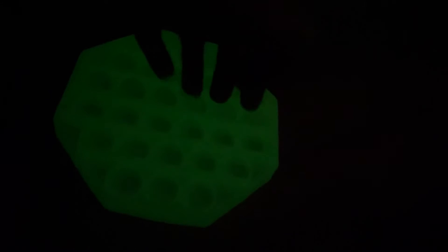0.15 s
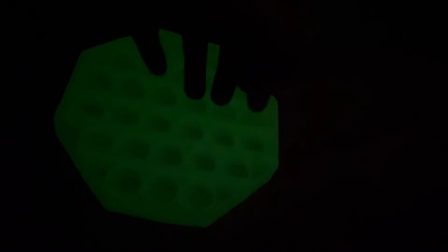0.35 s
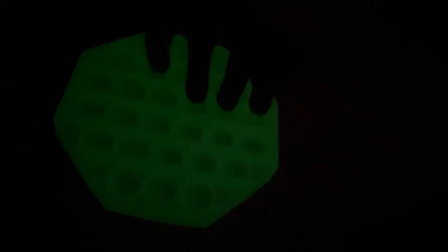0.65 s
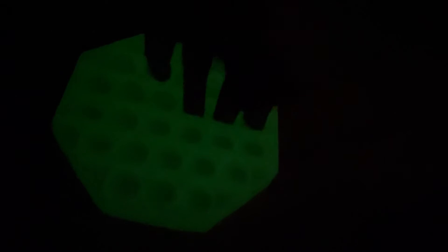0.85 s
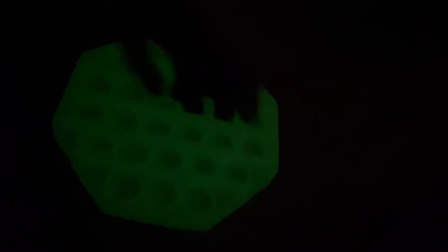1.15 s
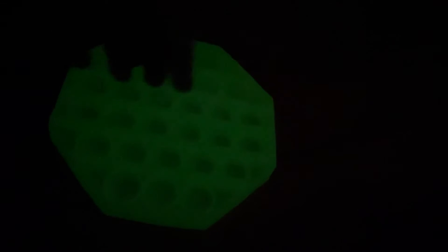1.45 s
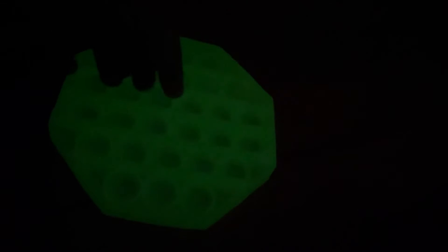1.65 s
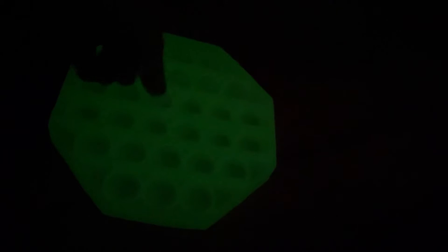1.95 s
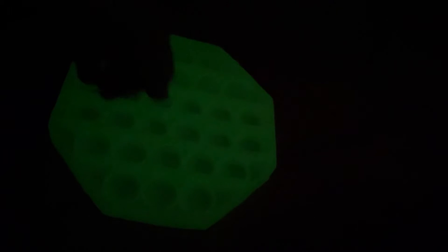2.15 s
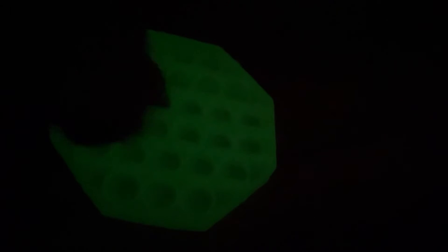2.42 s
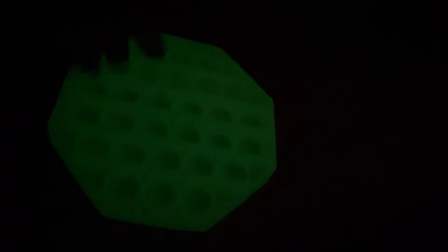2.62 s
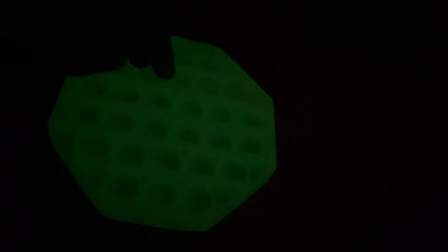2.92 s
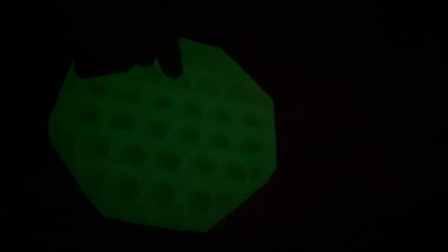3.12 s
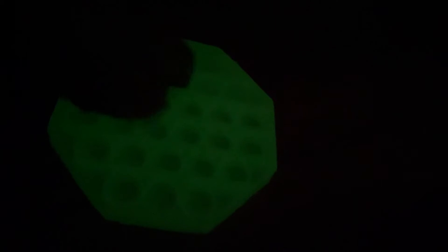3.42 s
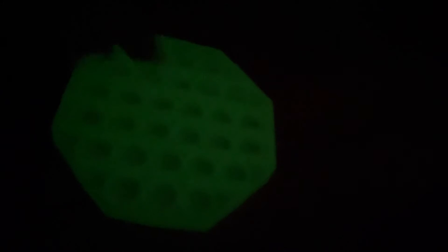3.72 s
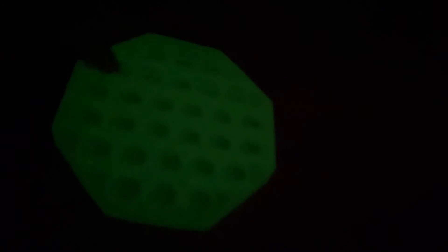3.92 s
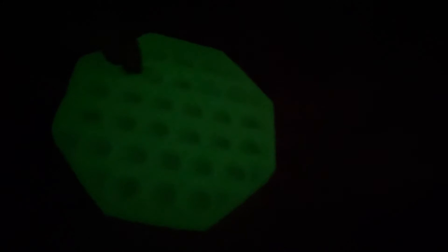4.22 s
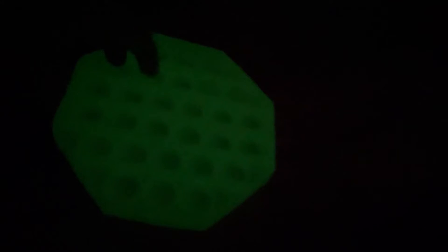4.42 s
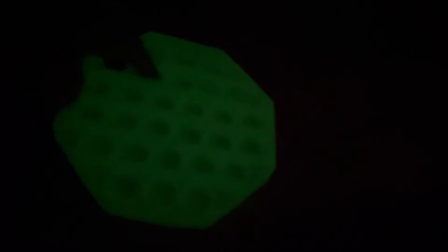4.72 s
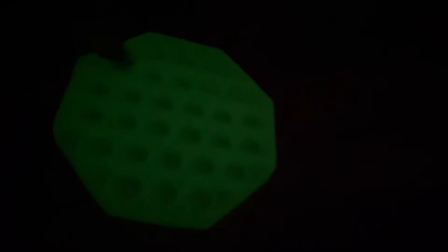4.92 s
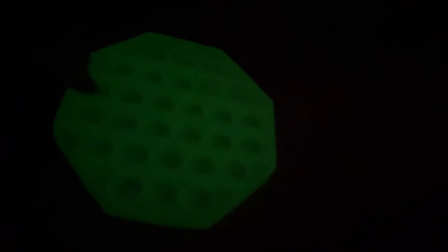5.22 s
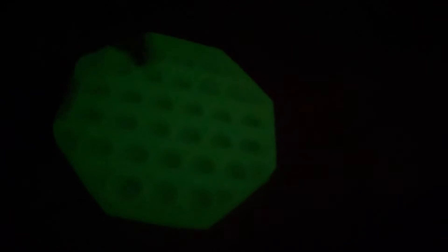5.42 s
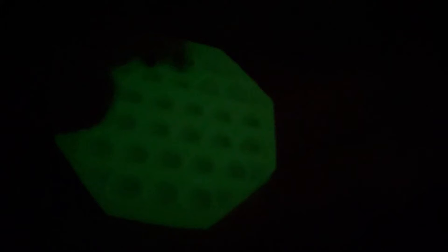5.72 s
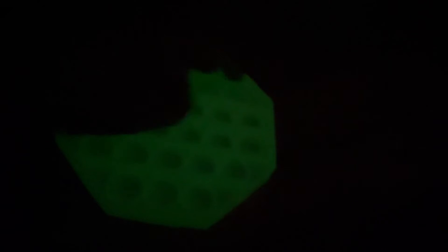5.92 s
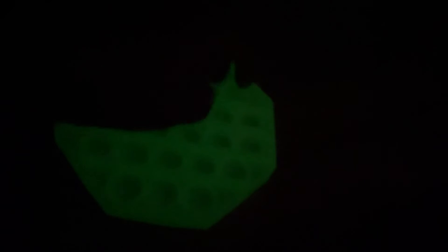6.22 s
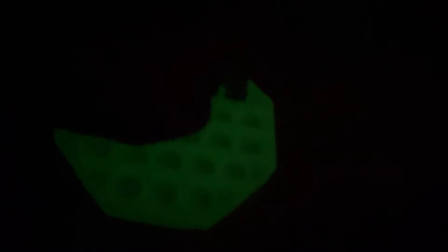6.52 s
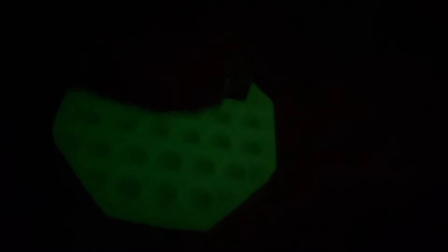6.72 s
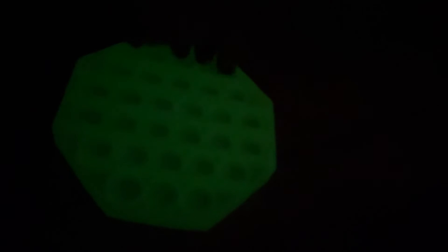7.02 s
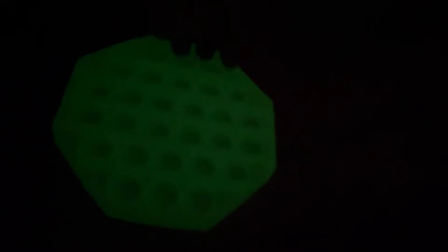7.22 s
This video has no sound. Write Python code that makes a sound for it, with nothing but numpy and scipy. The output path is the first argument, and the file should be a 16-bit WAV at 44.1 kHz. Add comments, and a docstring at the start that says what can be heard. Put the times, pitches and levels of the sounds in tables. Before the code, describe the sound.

Silicone fidget-toy domes pop hollowly under fingertips, with soft table thuds, skin scuffs and sticky crackles over a wavering low hum in a quiet room.

```python
"""The bubbles of a silicone fidget toy are pressed on a table, close by in a quiet room.
Each dome snaps through with a hollow pop, made of a short swing, ringing rim modes and quick echoes.
Fingertips thud on the table as ringing modes; tacky rubber crackles and scuffs as snaps in resonators.
Skin brushes over the toy as flickering noise with gritty squeaks.
Farther back lie a low hum that wavers and the noise of the room air; diffuse reverberation follows."""
import sys
import numpy as np
from scipy import signal
from scipy.io import wavfile

SR = 44100
rng = np.random.default_rng(int(sys.argv[2]) if len(sys.argv) > 2 else 0)


def to_wav(s):
    """Save 16-bit WAV."""
    ch = np.atleast_2d(s).T  # columns
    pcm = np.round(np.clip(ch, -1, 1) * 32767)  # PCM
    wavfile.write(sys.argv[1], SR, pcm.astype(np.int16))


N = 324576
TIME = np.arange(N) / SR  # s

# low hum before placement: (t/s, level/dB)
HUM_LEVEL = [(0.0, -46.5), (0.53, -40), (0.65, -55), (0.84, -42.5), (1.82, -41), (1.97, -48), (2.33, -38),
             (2.48, -47), (2.64, -34), (3.05, -45), (3.32, -39), (3.63, -57), (3.94, -48.5), (5.49, -57),
             (5.7, -43.5), (6.17, -59), (6.44, -54.5), (6.6, -44), (6.93, -40.5), (7.36, -46.5)]
HUM_HZ = 50.36
# colour of the room air: (f/Hz, relative level per Hz/dB)
AIR_COLOUR = [(65, 5.5), (82, -2.5), (165, -12), (245, -17), (320, -25), (700, -36), (1500, -48),
              (7000, -50.5), (9000, -52.5), (12000, -46.5), (16000, -81)]
AIR_DB = -60.5
# correlation of left and right in diffuse noise: (f/Hz, likeness)
STEREO_LIKENESS = [(100, 0.9), (400, 0.57), (1500, 0.062), (12000, 1)]
# decay of the room by 60 dB: (f/Hz, t60/s)
ROOM_DECAY = [(1000, 0.31), (12000, 0.22)]
# skin brushing the toy, before the gains in brushing():
# (start of full strength t/s, time held/s, rub level/dB, fine hiss level/dB)
BRUSH_STROKES = [(0.658, 0.071, -67.5, -81), (0.888, 0.063, -77.5, -79), (1.132, 0.0081, -62, -64.5),
                 (1.158, 0.031, -63.5, -74), (1.223, 0.021, -59.5, -73.5), (1.299, 0.026, -66.5, -73),
                 (1.392, 0.087, -81, -90), (1.751, 0.028, -73, -86), (2.251, 0.037, -59.5, -74),
                 (2.465, 0.0093, -67.5, -83), (2.506, 0.032, -60, -68), (3.391, 0.077, -72, -69.5),
                 (3.609, 0.048, -63.5, -68), (4.146, 0.045, -77, -88), (4.459, 0.092, -77.5, -74.5),
                 (4.606, 0.11, -61.5, -70.5), (5.543, 0.096, -100, -83), (5.918, 0.059, -79, -78.5),
                 (6.808, 0.034, -64, -71)]
STROKE_ATTACK_S, STROKE_RELEASE_SHARE = 0.022, 0.87  # the fade is a share of the time held
# colour of the rub: (f/Hz, relative level per Hz/dB)
RUB_COLOUR = [(400, -19.5), (750, 7), (1200, -1.5), (1600, -2.5), (2300, -6), (3600, -19.5), (7000, -30),
              (12000, -51)]
# colour of the fine hiss: (f/Hz, relative level per Hz/dB)
HISS_COLOUR = [(1500, 6.5), (6000, 1), (8500, -1), (10500, 17), (12200, 7), (14000, -14.5)]
RUB_LEFT_DB = 6  # the rub is louder on the left
# fingertips sticking and slipping, before placement:
# (t/s, peak level/dB, length/s, starting pitch f/Hz)
STICK_SLIPS = [(0.684, -52.5, 0.013, 1055), (1.133, -52, 0.0094, 900), (1.281, -57.5, 0.062, 770),
               (1.483, -64, 0.035, 780), (1.513, -67, 0.015, 2030), (1.73, -82, 0.039, 780),
               (1.949, -64, 0.034, 670), (2.246, -34, 0.019, 730), (2.638, -55, 0.019, 990),
               (3.396, -42.5, 0.03, 1900), (3.71, -28, 0.0053, 1835), (4.609, -55, 0.1, 760),
               (4.659, -47, 0.018, 2160), (4.684, -45, 0.03, 2130), (4.763, -57, 0.045, 1140),
               (4.852, -68.5, 0.026, 1120), (4.9186, -56, 0.017, 1300), (4.997, -62, 0.046, 815),
               (5.917, -65, 0.085, 1830), (6.148, -67, 0.042, 710), (6.796, -52.5, 0.013, 1200),
               (7.031, -39.5, 0.018, 898), (7.035, -52, 0.014, 1780), (7.1225, -59, 0.01, 1450),
               (7.214, -64.5, 0.039, 850)]
# tacky rubber letting go of the skin, before placement:
# (t/s, peak level/dB, decay time/s, ring f/Hz)
RUBBER_RELEASES = [(0.746, -41.5, 0.0019, 1900), (0.7626, -42.5, 0.0025, 3950), (0.77, -41, 0.01, 2440),
                   (0.787, -40, 0.0039, 9200), (2.2168, -49.5, 0.0017, 2400), (2.2555, -25, 0.0035, 3970),
                   (2.2807, -34, 0.0033, 5460), (3.4183, -32.5, 0.004, 2300), (3.7064, -31, 0.0015, 4930),
                   (4.27, -62.5, 0.013, 6430), (4.607, -25, 0.0063, 11400), (4.6073, -40, 0.016, 2770),
                   (6.506, -44, 0.0014, 2007), (6.528, -38, 0.0016, 2550), (6.5365, -45.5, 0.007, 9800)]
# resonances that colour a crackle: (f/Hz, width/Hz, level/dB)
RUBBER_RESONANCES = [(1931, 180, 2.5), (3000, 530, -15.5), (4993, 240, -11), (7220, 280, -7),
                     (11100, 5200, 3)]
RING_Q = 3.5
# louder crackles are sharper: brightness grows as a power of their strength
SHARP_ABOVE_DB, SHARP_POWER = -35, 0.65
# fingertips landing on the table, before placement:
# (t/s, tip peak level/dB, tip contact f/Hz, pad peak level/dB)
TABLE_BLOWS = [(0.755, -33, 235, -47), (0.929, -45, 119, -72), (2.249, -30.5, 108, -28),
               (3.397, -37, 154, -34.5), (3.458, -41.5, 216, -41.5), (3.715, -34.5, 117.8, -53),
               (4.093, -45.5, 327, -41.5), (4.53, -31, 189, -35.5), (4.589, -37, 174, -46.5),
               (6.513, -39, 222, -47.5), (6.545, -27.5, 200, -25), (6.607, -45, 110, -52.5),
               (7.0464, -28.5, 254, -41)]
# modes of the table top, before each blow shifts them: (f/Hz, level/dB, t60/s)
TABLE_MODES = [(86.5, -6.5, 0.3), (105, -8, 0.36), (145.3, -0.5, 0.14), (178, -4, 0.023),
               (266.2, -4, 0.068), (451.3, -11, 0.044)]
# the soft pad flattens a moment after the tip, always with the same low contact pitch
PAD_DELAY_S, PAD_HZ = 0.015, 129
# domes snapping through and smaller flicks of the rubber, before echoes and placement:
# (crest t/s, peak level/dB, pitch f/Hz)
DOME_POPS = [(0.7397, -36, 745), (0.7456, -27.5, 874), (0.7498, -23, 736), (0.7725, -37, 1150),
             (2.2172, -45, 1170), (2.2349, -35, 590), (2.2804, -23, 700), (2.524, -37, 910),
             (3.3912, -29, 684), (3.41, -37.5, 990), (3.453, -44, 870), (3.7074, -14.5, 1305),
             (4.0887, -51.5, 711), (4.368, -54, 1378), (4.5248, -29, 1053), (4.547, -40.5, 665),
             (4.588, -44, 902), (6.506, -27, 1038), (6.5292, -24, 1167), (6.5385, -19, 955),
             (6.833, -45, 1640), (7.0395, -37, 683)]
# modes of the rim of a dome: (f/Hz, level/dB, t60/s)
RIM_MODES = [(736, -5, 0.02), (1000, -7, 0.03), (1356, -4, 0.041), (1880, -1, .035), (2113, 3.5, 0.04)]
# nearby surfaces: (delay/ms, signed reflection strength)
NEAR_ECHOES = [(1.698, 0.22), (3.203, -.16), (5.5, 0.2)]
CUTOFF_HZ = 16000


def from_db(db):
    """Decibels to gain."""
    return 10 ** (np.asarray(db) / 20)


def rms_one(x):
    """Scale to unit power."""
    return x / np.sqrt(np.mean(x ** 2) + 1e-20)


def at_hz(points, hz):
    """Read a table on a log-frequency axis."""
    f, value = np.transpose(points)
    return np.interp(np.log(hz), np.log(f), value)


def cut(x, hz, kind, order=2):
    """Low- or high-pass."""
    sections = signal.butter(order, min(hz, .45 * SR), kind, fs=SR, output="sos")
    return signal.sosfilt(sections, x)


def resonate(x, hz, q):
    """One resonance, gain 1 on top."""
    return signal.lfilter(*signal.iirpeak(hz, q, fs=SR), x)


def struck(modes, t):
    """Modes ringing after a blow, each dying by 60 dB in its t60."""
    return sum(from_db(db - 60 * t / t60) * np.sin(2 * np.pi * hz * t) for hz, db, t60 in modes)


def delay(x, ms):
    """The same sound a little later."""
    return np.interp(TIME - ms / 1000, TIME, x, left=0)


def place(x, left_db, lag_ms):
    """A source off centre: louder on the left, a hair later on the right."""
    left = x * from_db(left_db / 2)
    right = delay(x, lag_ms) * from_db(-left_db / 2)
    return np.array([left, right])


def add(track, s, peak_db, sound):
    """Lay a sound into a track at a time and peak level."""
    at = round(s * SR)
    scaled = from_db(peak_db) * sound / np.abs(sound).max()
    track[at:at + len(sound)] += scaled[:N - at]


def drift(rate):
    """Chance values, `rate` a second and joined by straight lines, scaled to rms 1."""
    return rms_one(np.interp(TIME * rate, np.arange(4000), rng.standard_normal(4000)))


def noise_bands(size):
    """Third-octave bands of stereo noise, left and right as alike as the table says: (Hz, band)."""
    edges = np.geomspace(63, 16000, 25)
    white = rng.standard_normal((2, 2, size))
    for k, (low, high) in enumerate(zip(edges, edges[1:])):
        sections = signal.butter(2, [low, high], "band", fs=SR, output="sos")
        mid, side = signal.sosfilt(sections, white[k % 2])  # neighbouring bands stay independent
        hz = np.sqrt(low * high)
        alike = np.clip(at_hz(STEREO_LIKENESS, hz), -1, 1)
        yield hz, np.sqrt(1 + alike) * mid + np.sqrt(1 - alike) * side * [[1], [-1]]


def noise(spectrum, patchy_db=0):
    """Stereo noise with a given colour, each band flickering on its own by patchy_db; rms 1."""
    total = 0
    for hz, band in noise_bands(N):
        if hz >= spectrum[0][0]:
            total = total + from_db(at_hz(spectrum, hz) + patchy_db * drift(35)) * band
    return rms_one(total)


def room_air():
    """The quiet around the table: steady diffuse noise."""
    return from_db(AIR_DB) * noise(AIR_COLOUR)


def hum(octave_db, waver_hz, flutter_db):
    """A low tone that swells and wavers, with a weak, unsteady octave."""
    level_db = np.interp(TIME, *np.transpose(HUM_LEVEL)) + flutter_db * drift(14)
    phase = 2 * np.pi * np.cumsum(HUM_HZ + waver_hz * drift(8.7)) / SR
    octave = from_db(octave_db) * np.sin(2 * phase + drift(3.5))
    return np.sqrt(2) * from_db(level_db) * (np.sin(phase) + octave)


def room(x, onset_s):
    """Diffuse reflections build up quickly and die sooner in the treble."""
    t = np.arange(SR // 2) / SR
    tail = sum(band * from_db(-60 * t / at_hz(ROOM_DECAY, hz)) for hz, band in noise_bands(len(t)))
    tail = tail * (1 - np.exp(-(t / onset_s) ** 2))
    unit_tail = tail / np.sqrt(np.sum(tail ** 2) / 2)
    return signal.fftconvolve(x, unit_tail, axes=1)[:, :N]


def sliding():
    """Strength of the rub and of the hiss: each stroke sets in, holds and fades."""
    power = 0
    for s, length, rub_db, hiss_db in BRUSH_STROKES:
        before = np.maximum(s - TIME, 0) / STROKE_ATTACK_S
        after = np.maximum(TIME - s - length, 0) / (STROKE_RELEASE_SHARE * length)
        fade = np.exp(-2 * np.minimum(before + after, 20))
        power = power + from_db([[rub_db], [hiss_db]]) ** 2 * fade
    return np.sqrt(power)


def brushing(rub_gain_db, hiss_gain_db, catch_db, idle_db, slip_db, slips_per_s,
             squeak_hz, squeak_width_hz):
    """Skin slides unevenly over silicone with gritty squeaks; the resting hand rustles faintly."""
    slide, graze = sliding()
    catching = catch_db * drift(140)
    rub_strength = np.hypot(from_db(rub_gain_db + catching) * slide, from_db(idle_db))
    rub = rub_strength * noise(RUB_COLOUR, patchy_db=3.0) * from_db([[RUB_LEFT_DB], [0]])
    hiss = graze * from_db(hiss_gain_db + catching / 2) * noise(HISS_COLOUR)
    slips = rng.random(N) < slips_per_s / SR
    snaps = slips * rng.choice([-1, 1], N) * rng.random(N) + 1e-18
    squeak = rms_one(resonate(snaps, squeak_hz, squeak_hz / squeak_width_hz))
    return rub + hiss + place(from_db(slip_db) * slide * squeak, left_db=6.5, lag_ms=0.06)


def scuffs(slips_per_s, grain_db, width_hz, stretch_per_s, rise_s, low_hz, top_hz):
    """Uneven stick-slip jerks ring the silicone under a fingertip; its pitch climbs as it stretches."""
    out, t = np.zeros(N), np.arange(SR // 4) / SR
    for s, db, length, hz in STICK_SLIPS:
        happens = rng.random(len(t)) < slips_per_s / SR
        sizes = from_db(grain_db * rng.uniform(-1.1, 1, len(t)))
        slips = happens * rng.choice([-1, 1], len(t)) * sizes
        pressure = (1 - np.exp(-t / rise_s)) * np.exp(-(t / length) ** 4)
        ring = resonate(slips * pressure + 1e-18, hz, hz / width_hz)
        climbing = np.interp(t + stretch_per_s * t ** 2 / 2, t, ring)  # read ever faster
        add(out, s, db, cut(cut(climbing, top_hz, "low", order=4), low_hz, "high"))
    return out


def rubber(snaps):
    """Tiny snaps ring in the resonances of the rubber."""
    return sum(from_db(level) * resonate(snaps, hz, hz / width)
               for hz, width, level in RUBBER_RESONANCES)


def crackles(first_db, grain_db, ring_db, bright_ratio, fine_hz):
    """Tacky rubber parts with one sharp snap and a dying run of tiny ones that ring the stretched spot."""
    out, t = np.zeros(N), np.arange(SR // 8) / SR
    for s, db, length, ring_hz in RUBBER_RELEASES:
        sizes = from_db(grain_db * rng.uniform(-1.6, 1, len(t)))
        snaps = rng.choice([-1, 1], len(t)) * sizes * np.exp(-t / length)
        snaps[0] = from_db(first_db)
        sound = rubber(snaps) + from_db(ring_db) * resonate(snaps, ring_hz, RING_Q)
        sharpness = from_db(SHARP_POWER * max(db - SHARP_ABOVE_DB, 0))
        bright_hz = bright_ratio * ring_hz * sharpness
        low_hz = ring_hz * min((ring_hz / fine_hz) ** 3, 1)  # the finest hardly stir low resonances
        add(out, s, db, cut(cut(sound, bright_hz, "low"), low_hz, "high"))
    return out


def thuds(detune, uneven_db):
    """Tip, then pad, drives table modes near its contact pitch; the hand's weight shifts each blow."""
    out, t = np.zeros(N), np.arange(SR // 3) / SR
    for s, tip_db, tip_hz, pad_db in TABLE_BLOWS:
        contacts = (s, tip_db, tip_hz), (s + PAD_DELAY_S, pad_db, PAD_HZ)
        for at, db, contact_hz in contacts:
            chance = rng.standard_normal((len(TABLE_MODES), 2))
            loaded = [(hz * (1 + detune * a), level + uneven_db * b, t60)
                      for (hz, level, t60), (a, b) in zip(TABLE_MODES, chance)]
            soft = cut(cut(struck(loaded, t), 1.7 * contact_hz, "low"), 0.5 * contact_hz, "high")
            add(out, at, db, soft)
    return out


def pops(rim_db, spread_cycles, bass_share):
    """A dome gathers speed, flips and stops within about two swings, leaving the rim modes ringing."""
    out, lead = np.zeros(N), SR // 250
    t = np.arange(-lead, SR // 20) / SR  # the crest is at 0
    rim = struck(RIM_MODES, t[lead:])
    for s, db, hz in DOME_POPS:
        swing = np.exp(-.5 * (hz * t / spread_cycles) ** 2)
        flip = np.cos(2 * np.pi * hz * t) * swing
        ring = signal.fftconvolve(flip, rim)[:len(t)] / swing.sum()
        sound = flip + from_db(rim_db) * ring
        add(out, s - lead / SR, db, cut(sound, bass_share * hz, "high"))  # a small dome radiates little bass
    # quick echoes make the pop hollow
    return out + sum(strength * delay(out, ms) for ms, strength in NEAR_ECHOES)


def scene():
    """The toy close by, a little to the left, its finest crackle central, over hum and room air."""
    tone = hum(octave_db=-20.0, waver_hz=1.3, flutter_db=2.0)
    background = place(tone, left_db=2.0, lag_ms=0.057) + room_air()
    skin = brushing(rub_gain_db=-7.0, hiss_gain_db=-0.5, catch_db=3.5, idle_db=-89.5, slip_db=-13,
                    slips_per_s=600, squeak_hz=2370, squeak_width_hz=880)
    jerks = scuffs(slips_per_s=3700, grain_db=7.5, width_hz=250, stretch_per_s=2.0,
                   rise_s=0.00069, low_hz=514, top_hz=3520)
    scuff = place(jerks, left_db=4.0, lag_ms=0.16)
    snap = crackles(first_db=19.5, grain_db=8, ring_db=1, bright_ratio=1.05, fine_hz=11500)
    split_hz = 6000  # crackle above this stays in the middle
    crackle = place(cut(snap, split_hz, "low", order=3), left_db=7.0, lag_ms=0.05)
    crackle = crackle + cut(snap, split_hz, "high", order=3)
    thud = place(thuds(detune=0.045, uneven_db=3.5), left_db=2.5, lag_ms=0.03)
    pop = place(pops(rim_db=-8.5, spread_cycles=0.47, bass_share=0.46), left_db=5.5, lag_ms=0.15)
    sent = from_db(-18.0) * pop + from_db(-10.0) * thud + from_db(-13.5) * (crackle + scuff)
    wet = room(sent, onset_s=0.0033)
    return background + skin + scuff + crackle + thud + pop + wet


def record(dry):
    """The left microphone port turns the treble phase over; the top rolls off, then is cut steeply."""
    port_hz, port_width_hz, port_gain, rolloff_hz = 8460, 4500, 2.1, 13500
    left = dry[0] - port_gain * resonate(dry[0], port_hz, port_hz / port_width_hz)
    heard = cut([left, dry[1]], rolloff_hz, "low", order=4)
    steep = signal.ellip(10, .1, 80, CUTOFF_HZ, fs=SR, output="sos")
    return signal.sosfilt(steep, heard)


dry = scene()
out = record(dry)
to_wav(out)
```